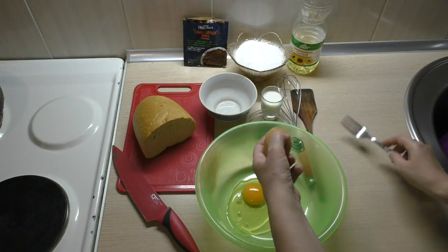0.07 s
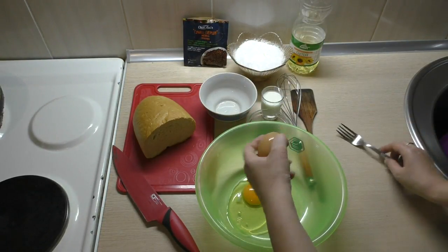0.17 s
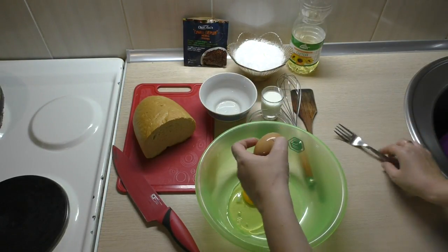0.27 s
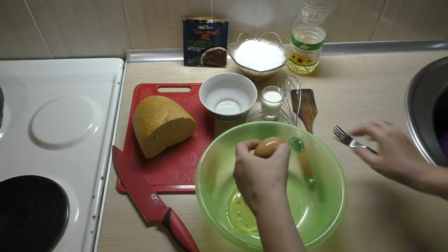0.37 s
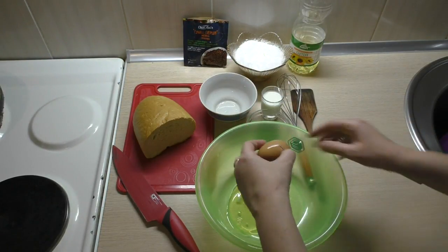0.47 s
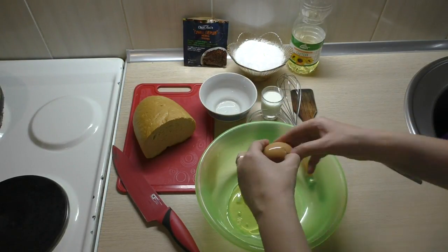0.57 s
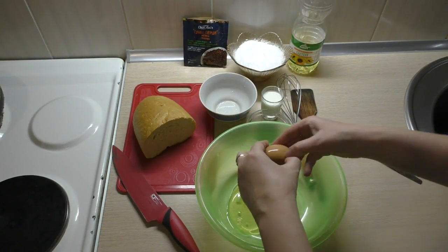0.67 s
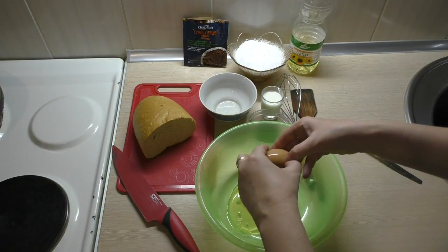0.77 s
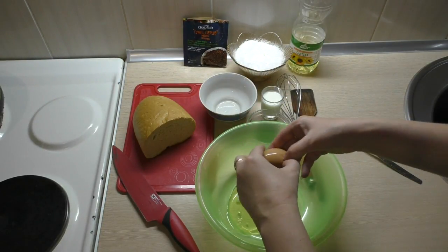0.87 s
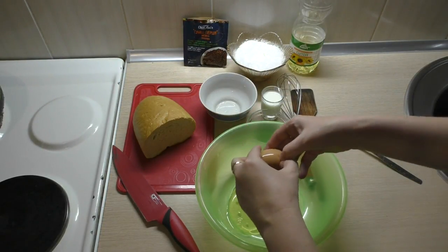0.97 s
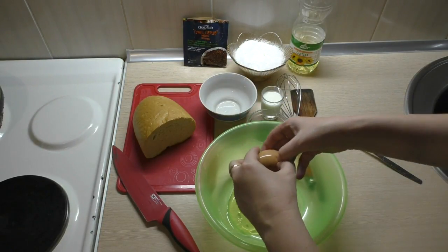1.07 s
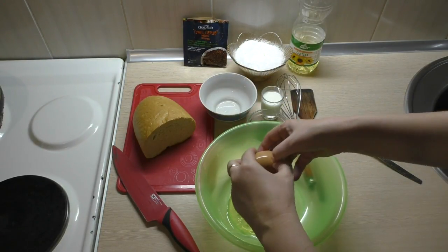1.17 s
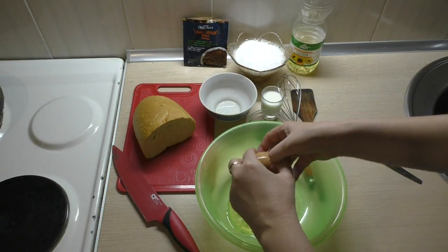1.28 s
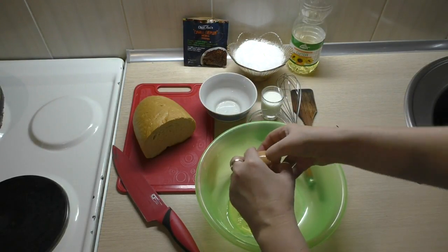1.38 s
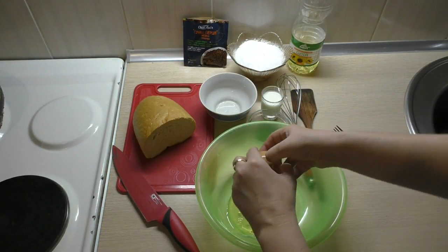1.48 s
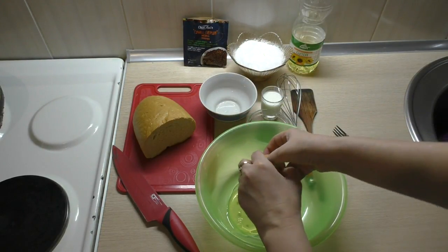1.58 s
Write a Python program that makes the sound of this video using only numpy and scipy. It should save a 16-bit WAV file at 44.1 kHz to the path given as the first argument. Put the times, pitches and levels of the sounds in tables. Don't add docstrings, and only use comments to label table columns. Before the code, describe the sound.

Loud fork drop with hard knocks and clinking tines, followed by faint eggshell rubbing and snapping

```python
import sys
import numpy as np
from scipy import signal
from scipy.fft import rfft, irfft
from scipy.io import wavfile
from scipy.ndimage import uniform_filter1d

SR = 44100
rng = np.random.default_rng(int(sys.argv[2]) if len(sys.argv) > 2 else 0)


def wav_out(sig):
    wavfile.write(sys.argv[1], SR, np.round(np.clip(np.atleast_2d(sig).T, -1, 1) * 32767).astype(np.int16))


def invert_db(x):
    u = np.asarray(x, float) / 20
    return 10 ** u


N = 70560


def read(points, hz):
    f, value = np.transpose(points)
    return np.interp(np.log(hz + 1), np.log(f + 1), value)


def evened(x):
    return x / np.sqrt(np.mean(x ** 2) + 1e-20)


def add(mix, s, sound):
    part = mix[round(s * SR):][:len(sound)]
    part += sound[:len(part)]


def pressure(s, db):
    return invert_db(np.interp(np.arange(N) / SR, s, db, -120, -120))


def click(points, tilt_db=0., size=2048):
    hz = abs(np.fft.fftfreq(size, 1 / SR))
    level_db = read(points, hz) + tilt_db * np.log2((hz + 200) / 3000)
    log_gain = np.log(invert_db(np.maximum(level_db, -100)))
    phase = -signal.hilbert(log_gain).imag
    tap = np.fft.ifft(np.exp(log_gain + 1j * phase)).real[:size // 2]
    return tap / abs(tap).max()


def shaped(x, points):
    return irfft(rfft(x) * invert_db(read(points, np.fft.rfftfreq(N, 1 / SR))), N)


def grit(per_s, spread_db):
    size = invert_db(spread_db * np.minimum(rng.exponential(1, N), 4))
    hit = rng.random(N) < per_s / SR
    return size * hit * rng.choice([-1, 1], N)


def grains(rough, colour):
    return signal.oaconvolve(rough, evened(colour) / 32)[:N]


def ring(modes, scatter_db, low_db=0, free_s=0.44):
    t, out = np.arange(SR // 2) / SR, 0
    for (hz, db, t60), (a, b, c) in zip(modes, rng.random((len(modes), 3))):
        beat = 1 + .15 * np.cos(2 * np.pi * ((18 + 30 * a) * t + c))
        level_db = db + scatter_db * (a - .5) + low_db * (hz < 7300) - 60 * t / min(t60, .8)
        out = out + invert_db(level_db) * beat * np.sin(2 * np.pi * (hz * t + b))
    held_t60 = 0.011
    attack = np.minimum(t / 0.00044, 1)
    return out * attack * invert_db(-60 * np.maximum(t - free_s, 0) / held_t60)


def burst(db, colour, decay_s):
    t = np.arange(1200) / SR
    chatter = rng.standard_normal(len(t)) * np.exp(-t / decay_s) * (1 - np.exp(-t / 0.0001))
    sound = np.convolve(chatter, colour)
    return invert_db(db) * sound / abs(sound).max()


def snap(db, hz, cycles=18):
    turns = np.arange(900) * hz / SR
    return invert_db(db - 60 * turns / cycles) * np.sin(2 * np.pi * turns) * np.minimum(turns, 1)


# (f/Hz, level/dB)
AIR_COLOUR = [(18, -74), (30, -40), (221, -5), (426, -3.5), (461, -12.5), (1810, -9), (2290, -19),
              (2540, -14), (16000, -31)]
# (f/Hz, width/Hz, level/dB)
APPLIANCE_HUM = [(214, 530, -4), (1640, 35, -27), (2190, 150, 4), (2580, 125, 5)]
# (f/Hz, side minus mid level/dB)
AIR_WIDTH = [(60, -16), (180, -32), (550, -22), (1650, -12), (4970, -5), (15000, 2)]


def air():
    hz = np.fft.rfftfreq(N, 1 / SR)
    bumps = sum(invert_db(db + 2.0) / (1 + (2 * (hz - f) / width) ** 2) for f, width, db in APPLIANCE_HUM)
    a, b, c = rng.standard_normal((3, N))
    slow = uniform_filter1d(uniform_filter1d(c, 700), 700)
    flutter = invert_db(1.83 * evened(slow))
    colour = invert_db(read(AIR_COLOUR, hz)) * (0.94 + bumps)
    mid, side = irfft(rfft([a * flutter, b]) * colour, N)
    return invert_db(-53) * np.array([mid, shaped(side, AIR_WIDTH)]) / np.std(mid)


# (t/s, peak level/dB, treble tilt/dB per octave)
KNOCK_HITS = [(0.201, -3.5, 0.5), (0.205, -11, 7), (0.2163, -12, -5.5), (0.23, -8, -4.5), (0.251, -19, -3),
              (0.3026, -2.5, 4), (0.3405, -10.5, -5), (0.354, -14, -3), (0.372, -0.5, 5.5),
              (0.3793, -10, 2), (0.381, -12, -3.5), (0.3974, -9, 2), (.414, -6, 0.5), (0.419, -16.5, 4),
              (0.4447, -7.5, -1), (.474, -15.5, 4.5), (0.502, -17, -1), (0.514, -21, 2.5), (0.525, -20, 1),
              (0.53, -20, -2), (0.542, -15, 2)]
# (t/s, peak level/dB, f/Hz)
FLAT_SLAPS = [
    (.2018, -2, 2730),
    (0.304, -8, 3020),
    (0.3397, -16, 2290),
    (0.3721, -2, 2900),
    (.3775, -11, 5840),
]
# (t/s, peak level/dB, lower modes level/dB, free ring/s)
TINE_CLINKS = [
    (.3018, -13, 0, 0.058),
    (0.341, -15.5, -27, 0.057),
    (0.3614, -6, -6, 0.011),
    (.376, -22.5, 0, 0.073),
    (.410, -14, -9, 0.029),
    (0.448, -18, 1, 0.069),
    (.520, -18, -31, .06),
    (.548, -26, -17, 0.066),
    (.610, -35.5, -27, 0.208),
    (.665, -44, 0, .1),
]
# (f/Hz, level/dB)
LAMINATE = [(120, -58.5), (300, -17.5), (800, -16), (1200, -2.5), (2800, 2.5), (5000, -4), (7500, -10.5),
            (14200, -28.5)]


def knocks():
    out, blows = np.zeros(N), np.zeros(N)
    for s, db, tilt_db in KNOCK_HITS:
        add(out, s, burst(db + 1.5, click(LAMINATE, tilt_db), 0.00091))
        add(blows, s, invert_db([db]))
    for s, db, hz in FLAT_SLAPS:
        add(out, s, snap(db, hz))
    for s, db, _, _ in TINE_CLINKS:
        add(out, s, burst(db, click(LAMINATE, 19.5), 0.0042))
    return out, blows


# (t/s, level/dB)
SKID_PRESSURE = [(0.202, -20), (0.259, -26), (0.359, -22), (0.375, -10.5), (0.389, -24.5), (.49, -23),
                 (0.528, -19), (0.602, -36.5), (0.719, -55)]


def skid():
    s, db = np.transpose(SKID_PRESSURE)
    return evened(grit(8000, 3.4)) * pressure(s, db)


# (f/Hz, level/dB, t60/s)
BOARD_MODES = [(213, -11, 0.25), (346, 0, 0.14), (420, -5, 0.12), (510, 1, 0.12), (960, 1, 0.15)]


def fork():
    out, blows = knocks()
    rough = skid()
    out += invert_db(-2.5) * grains(rough, click(LAMINATE))
    drive = invert_db(-41.5) * blows + invert_db(-54.0) * rough
    out += signal.oaconvolve(drive, ring(BOARD_MODES, 0))[:N]
    return signal.sosfilt(signal.butter(4, 150, "high", fs=SR, output="sos"), out)


# (f/Hz, level/dB, t60/s)
LANDING_MODES = [(1192, -4, .15), (1620, -6, .15), (2175, -9, .22), (2550, -10, .2), (3668, -16, .4),
                 (3628, -9, .8), (3452, -11, .5), (4156, -13, .16), (5943, -6, .09), (6255, -7, .1),
                 (10050, -26, .18), (11430, -23, .25), (12220, -26, .17), (12700, -22, .07),
                 (13930, -25, .15)]
# (f/Hz, level/dB, t60/s)
STEEL_MODES = [(3628, -7, .5), (5033, 5, .8), (5970, -9, .12), (6732, -4, .15), (7951, -3, .45),
               (8142, -7, .35), (9372, -13, .2), (10026, -8, .2), (10300, -12, .15), (12210, -10, .3),
               (13700, -10, .12), (13920, -13, .15)]


def steel():
    flat_s, flat_db = .4, -14
    out = np.zeros(N)
    add(out, KNOCK_HITS[0][0], invert_db(-16) * ring(LANDING_MODES, 0, free_s=0.16))
    for s, db, low_db, free_s in TINE_CLINKS:
        muted_db = low_db + flat_db * (s > flat_s)
        add(out, s, invert_db(db - 15.0) * ring(STEEL_MODES, 5, muted_db, free_s))
    return out


# (t/s, level/dB, side share level/dB)
JOLTS = [
    (0.2046, -40, -27),
    (0.374, -30.5, -2.5),
]


def jolt(mid, side):
    for s, db, side_db in JOLTS:
        add(mid, s, invert_db(db) * np.hanning(90))
        add(side, s, invert_db(db + side_db) * np.hanning(90))


def handle():
    start_s, hz, db, t60 = .622, 1057, -46.5, 1.6
    rest_s, rest_t60, rise_hz_per_s = 0.8063, 0.33, 3.1
    t = np.arange(SR // 2) / SR
    rest = np.maximum(t + start_s - rest_s, 0)
    fade = invert_db(db - 60 * t / t60 - 60 * rest / rest_t60) * np.minimum(t / 0.021, 1)
    out = np.zeros(N)
    add(out, start_s, fade * np.sin(2 * np.pi * np.cumsum(hz + rise_hz_per_s * t) / SR))
    return out


# (f/Hz, level/dB)
SHELL_COLOUR = [(400, -18), (900, -13.5), (1500, -4.5), (3000, 0), (4700, 3), (7000, -3.5), (11600, -13.5),
                (16000, -28)]
# (t/s, pressure level/dB, bright part level/dB)
FINGER_RUBS = [
    [(.82, -69, -5), (.87, -57, -17), (.9, -73.5, 7), (1.045, -61.5, -4)],
    [(1.05, -69, -7), (1.057, -45.5, -14), (1.097, -56.5, -23), (1.103, -48, -6), (1.141, -49.5, -14),
     (1.147, -41, -17), (1.158, -39, -27), (1.2, -47, -20), (1.24, -47.5, -2)],
    [(1.241, -49.5, -2.5), (1.28, -44.5, 2.5), (1.322, -42.5, -0.5), (1.36, -49, -5.5), (1.4, -55, -4.5),
     (1.474, -66, 0)],
    [(1.475, -58, -10), (1.5, -48.5, -8), (1.52, -40, -16), (1.562, -45.5, -8), (1.575, -55, -7),
     (1.6, -47, -16)],
]


def rubs():
    dull, bright = evened(grit(8000, 3.6)), evened(grit(9000, 3.2))
    press, shine = np.zeros((2, N))
    for rub in FINGER_RUBS:
        s, db, bright_db = np.transpose(rub)
        press += pressure(s, db - 0.5)
        shine += pressure(s, db + bright_db)
    return grains(dull * press, click(SHELL_COLOUR, -2.4)) + grains(bright * shine, click(SHELL_COLOUR, 7.1))


# (t/s, peak level/dB, tilt/dB per octave)
SHELL_TICKS = [(.845, -67, 5), (.866, -45, 19), (1.051, -46, 7), (1.0555, -33, 16), (1.1012, -35, 13),
               (1.133, -43, 8), (1.1422, -29, -1), (1.149, -35, 3), (1.276, -33, 5), (1.2815, -28, 4),
               (1.416, -44, 8), (1.558, -30, 3)]
# (t/s, peak level/dB, f/Hz)
FLAKE_SNAPS = [(1.0555, -35.5, 3600), (1.101, -34, 4870), (1.1075, -34, 5100), (1.1425, -29.5, 1540),
               (1.149, -28, 2880), (1.155, -34, 2800), (1.1575, -31, 4330), (1.163, -24, 2980),
               (1.1665, -32, 2260), (1.172, -29, 3360), (1.1755, -40, 1860), (1.2005, -38, 2500),
               (1.301, -37, 4440), (1.314, -30, 3570), (1.327, -33, 5000), (1.336, -29, 4800),
               (1.5165, -28, 5100), (1.519, -35, 3720), (1.523, -31, 4270), (1.528, -26, 3150),
               (1.5315, -20.5, 4400), (1.536, -24, 5340), (1.547, -32, 3860), (1.554, -25, 4500),
               (1.561, -36, 5600), (1.566, -25.5, 4770)]


def crackle():
    out = np.zeros(N)
    for s, db, tilt_db in SHELL_TICKS:
        add(out, s, burst(db, click(SHELL_COLOUR, tilt_db), 0.0018))
    for s, db, hz in FLAKE_SNAPS:
        add(out, s, snap(db, hz))
    return out


# (t/s, level/dB, f/Hz)
BOWL_BUMPS = [
    (1.054, -40, 513),
    (1.066, -51, 520),
    (1.101, -49, 396),
    (1.302, -40.5, 470),
    (1.324, -40, 508),
    (1.363, -41.5, 390),
]


def bowl():
    out, t = np.zeros(N), np.arange(4000) / SR
    for s, db, hz in BOWL_BUMPS:
        fade = invert_db(db - 60 * t / 0.064) * np.minimum(t / 0.00079, 1)
        add(out, s, fade * np.sin(2 * np.pi * hz * t))
    return out


def egg():
    out = rubs() + crackle() + bowl()
    return signal.sosfilt(signal.butter(2, 250, "high", fs=SR, output="sos"), out)


# (f/Hz, t60/s)
ROOM_T60 = [(500, 0.23), (1000, 0.35), (4000, 0.32), (12000, 0.2)]
# (f/Hz, side minus mid level/dB)
ROOM_WIDTH = [(60, 7), (180, -52), (550, -29), (1650, -34), (4970, -10.5), (15000, 6.5)]
LAG_S = 1.5e-5


def kitchen(x):
    taps = np.zeros((2, SR))
    at = np.arange(100, SR - 20, 20) + rng.integers(0, 20, (2, (SR - 101) // 20))
    np.put_along_axis(taps, at, rng.choice([-1., 1.], at.shape), 1)
    hz, t, z = signal.stft(taps, SR, nperseg=256)
    tail = signal.istft(z * invert_db(-60 * t / read(ROOM_T60, hz)[:, None]), SR, nperseg=256)[1]
    tail = invert_db(-4.5) * tail / np.linalg.norm(tail[0])
    mid, side = signal.fftconvolve(x[None], tail, axes=1)[:, :N]
    return np.array([x + mid, invert_db(2) * shaped(side, ROOM_WIDTH) - LAG_S * SR / 2 * np.gradient(x)])


def scene():
    tines, note = steel(), handle()
    near = fork() + egg() + invert_db(-4.5) * tines + invert_db(-10.0) * note
    mid, side = kitchen(near) + air()
    mid = mid + note + invert_db(-5.5) * tines
    side = side - 3 * LAG_S * SR * invert_db(-22) * np.gradient(tines)
    jolt(mid, side)
    return np.array([mid + side, mid - side])


def band_limit(x):
    return signal.sosfilt(signal.butter(12, 16600, fs=SR, output="sos"), x)


def record(dry):
    x = np.clip(signal.sosfilt(signal.butter(1, 60, "high", fs=SR, output="sos"), dry), -1, 1)
    x = signal.oaconvolve(x, signal.firwin(511, 16100, window=("kaiser", 9), fs=SR)[None], "same")
    low = signal.oaconvolve(x, signal.firwin(511, 14350, window=("kaiser", 9), fs=SR)[None], "same")
    power = uniform_filter1d((x ** 2).mean(0), 500)
    shut = (power > invert_db(2 * -39)) & (power < invert_db(2 * -14))
    x = x - (x - low) * uniform_filter1d(shut * 1., 200)
    return band_limit(x)


dry = scene()
out = record(dry)
wav_out(out)
```